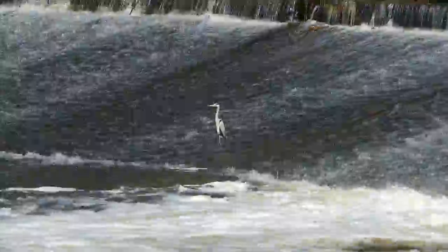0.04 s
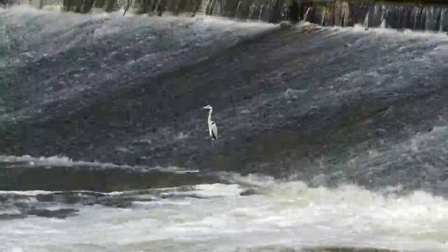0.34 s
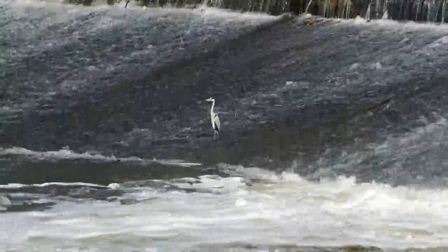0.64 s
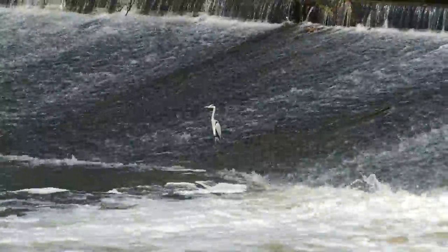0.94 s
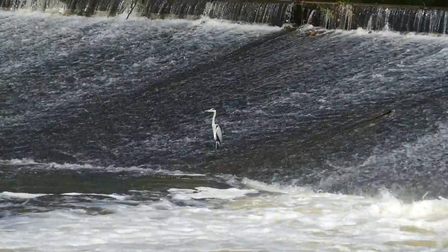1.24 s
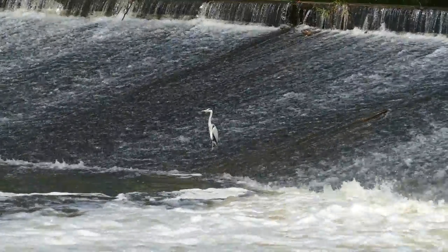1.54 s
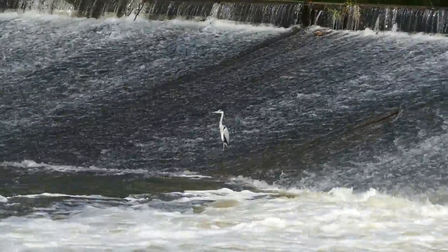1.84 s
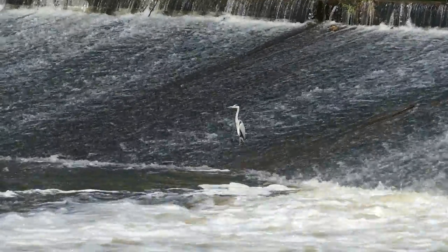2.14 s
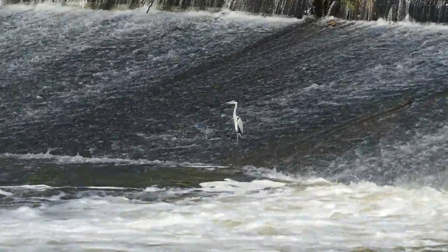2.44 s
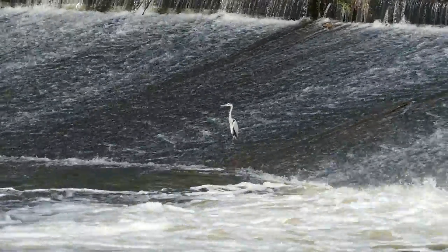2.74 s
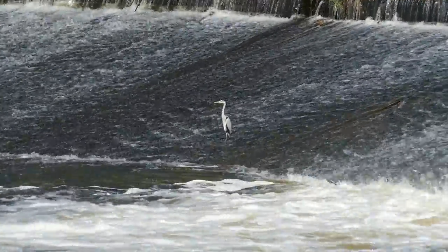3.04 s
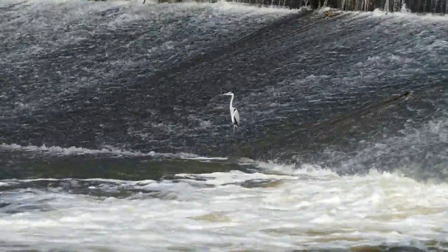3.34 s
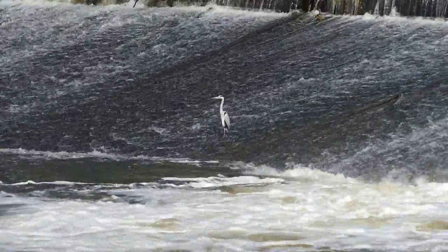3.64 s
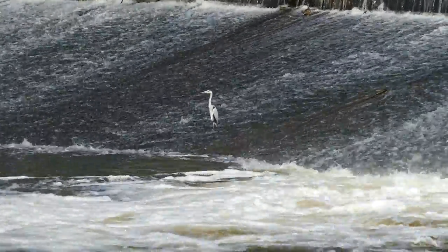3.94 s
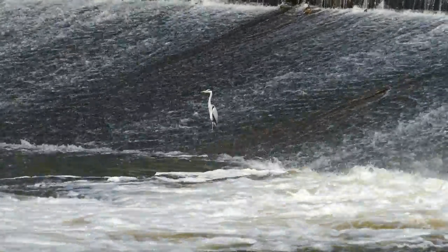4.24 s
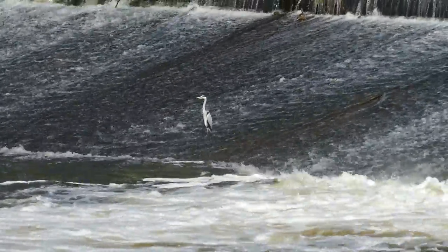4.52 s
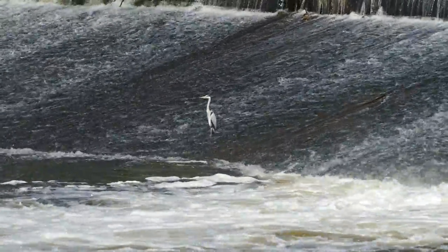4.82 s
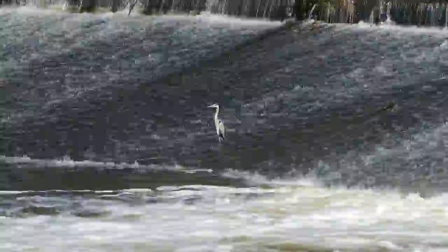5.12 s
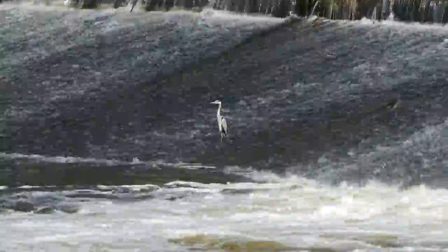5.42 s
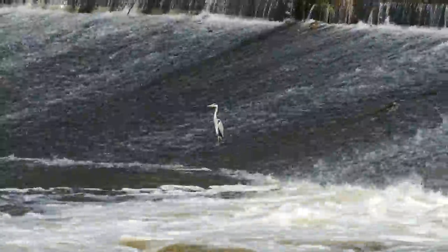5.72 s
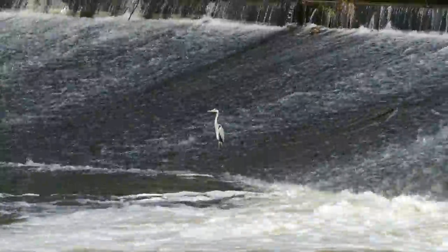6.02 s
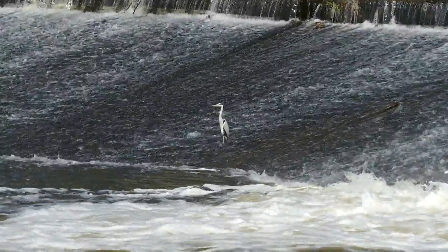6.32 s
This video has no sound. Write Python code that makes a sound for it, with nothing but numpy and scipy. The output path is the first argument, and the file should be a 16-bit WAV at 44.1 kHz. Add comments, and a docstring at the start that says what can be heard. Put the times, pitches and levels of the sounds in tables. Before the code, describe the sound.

The continuous rush and hiss of water sliding down a weir and churning into foam, with light gusts on the microphone.

```python
"""On a river bank, beside a broad weir where the water slides down and plunges into a pool of foam.
Clouds of resonating bubbles make the plunge roar; above it the thin sheet of water hisses, grained
by falling drops and bursting bubbles. Light gusts shed eddies at the two microphone ports and
rumble softly. The sound starts abruptly, with one small tick soon after."""
import sys
import numpy as np
from scipy import signal
from scipy.fft import rfft, irfft, next_fast_len
from scipy.io import wavfile
from scipy.ndimage import uniform_filter1d

SR = 44100
rng = np.random.default_rng(int(sys.argv[2]) if len(sys.argv) > 2 else 0)


def waveform_to_disk(signal):
    """Save audio, clipped to [-1, 1], as 16-bit WAV at the path in sys.argv[1]."""
    frames = np.transpose(np.atleast_2d(signal))
    scaled = np.clip(frames, -1, 1) * 32767
    samples = np.round(scaled).astype(np.int16)
    wavfile.write(sys.argv[1], SR, samples)


N = 280917
TIME = np.arange(N) / SR
START_S = 0.2283
CROSSOVER_HZ = 1270   # the roar lies below, the hiss above


def from_db(db):
    """Amplitude ratio of a level in decibels."""
    return 10 ** (np.asarray(db) / 20)


def unit_rms(x):
    """Normalisation to unit mean power."""
    return x / np.sqrt(np.mean(x ** 2) + 1e-20)


def in_time(points):
    """Linear interpolation of (time [s], value) rows at every sample."""
    return np.interp(TIME, *np.transpose(points))


def at_hz(points, hz):
    """Interpolation of (frequency [Hz], value) rows on a logarithmic axis."""
    centres, values = np.transpose(points)
    return np.interp(np.log(hz), np.log(centres), values)


def to_bins(x):
    """Fourier transform: frequencies and complex spectrum."""
    size = next_fast_len(N, True)
    return np.maximum(np.fft.rfftfreq(size, 1 / SR), 1), rfft(x, size)


def to_samples(bins):
    """Inverse Fourier transform."""
    return irfft(bins, next_fast_len(N, True))[..., :N]


def lowpass_gain(hz, edge_hz, order):
    """Magnitude response of a Butterworth low-pass."""
    return 1 / np.sqrt(1 + (hz / edge_hz) ** (2 * order))


def butterworth(x, edge_hz, kind, order=8):
    """Maximally flat low-pass or high-pass filtering."""
    return signal.sosfilt(signal.butter(order, edge_hz, kind, fs=SR, output="sos"), x)


def drift(rate_hz):
    """Slow random fluctuation: noise low-passed at rate_hz, with unit rms."""
    step, warm_up = 40, 2000
    pole = np.exp(-2 * np.pi * rate_hz * step / SR)
    noise = rng.standard_normal(N // step + warm_up + 2)
    slow = signal.lfilter([1], [1, -2 * pole, pole * pole], noise)[warm_up:]
    return np.interp(np.arange(N) / step, np.arange(len(slow)), unit_rms(slow))


def evened(x, window):
    """Division by the running rms takes the chance swells out of a noise."""
    power = uniform_filter1d(uniform_filter1d(np.mean(x ** 2, axis=0), window), window)
    return x * np.sqrt(np.mean(power) / (power + 1e-20))


def resonator(force, hz, radius):
    """A damped oscillator, whose amplitude shrinks by the factor `radius` each sample."""
    angle = 2 * np.pi * hz / SR
    return signal.lfilter([1, 0, -1], [1, -2 * radius * np.cos(angle), radius ** 2], force + 1e-18)


def impacts(per_s, spread_db):
    """Shot noise: randomly timed impulses, many small and a few large."""
    sizes = from_db(spread_db * np.minimum(rng.exponential(1, N), 4))
    return unit_rms(sizes * rng.choice([-1, 1], N) * (rng.random(N) < per_s / SR))


def bubbles(low_hz, high_hz, per_s, cycles, spread_db, sizes):
    """Bubble resonance: each size rings at its own frequency, falling 60 dB in `cycles` periods."""
    cloud = np.zeros(N)
    for hz in np.geomspace(low_hz, high_hz, sizes):
        radius = from_db(-60 * hz / (cycles * SR))
        ringing = resonator(impacts(per_s / sizes, spread_db), hz, radius)
        cloud += np.sqrt(hz) * unit_rms(ringing)   # about equal power per Hz
    return unit_rms(cloud)


# Gusts at the ports: (crest time [s], crest level [dB], decay time [s])
GUST_CRESTS = [(0.52, -48, 0.2), (1.24, -31, 0.67), (1.95, -33, 0.35), (2.32, -34.5, 0.64),
               (2.95, -30, 0.98), (3.6, -33, 0.27), (4.92, -34, 0.11), (5.95, -41, 0.13)]

def gust_envelope(rise_s=0.12, lull_db=-43.5):
    """Incoherent addition: the power of each rising and dying gust adds to that of the light air."""
    power = from_db(lull_db) ** 2
    for crest_s, db, decay_s in GUST_CRESTS:
        age = TIME - crest_s
        shape = np.exp(-(np.minimum(age, 0) / rise_s) ** 2 - np.maximum(age, 0) / decay_s)
        power = power + (from_db(db) * shape) ** 2
    return np.sqrt(power)


# Eddy pressure at the ports: (frequency [Hz], relative spectral level [dB])
EDDY_SPECTRUM = [(22, -38), (42, -19), (97, -5.5), (157, 0), (259, -2.5), (419, -10)]

def breeze(lump_db=3.5, top_hz=400, shared_db=-1.5):
    """Turbulent pressure: each port has its own eddies, larger ones reach both; all swell in gusts."""
    hz, white = to_bins(rng.standard_normal((2, N)) + from_db(shared_db) * rng.standard_normal(N))
    eddies = to_samples(white * from_db(at_hz(EDDY_SPECTRUM, hz)) * lowpass_gain(hz, top_hz, order=4))
    lumps = from_db(lump_db * np.array([drift(11), drift(9.5)]))
    return unit_rms(eddies * lumps) * gust_envelope()


# Impulses that excite the tick: (time [s], excitation level [dB])
TICK_SNAPS = [(0.3060, -14.5), (0.3076, -20), (0.3079, -23)]
# Resonances of the tick: (frequency [Hz], bandwidth [Hz], gain [dB])
TICK_MODES = [(3800, 1400, -16), (5500, 850, 1.5), (6960, 500, -12), (10000, 1100, -7), (12100, 700, -21)]

def tick(top_hz=11500):
    """Impulse response: three quick snaps near the microphone excite heavily damped resonances."""
    snaps = np.zeros(N)
    for time_s, db in TICK_SNAPS:
        snaps[int(time_s * SR)] = from_db(db)
    crack = np.zeros(N)
    for hz, width_hz, db in TICK_MODES:
        crack += from_db(db) * resonator(snaps, hz, radius=np.exp(-np.pi * width_hz / SR)) / 2
    return butterworth(crack, top_hz, "low", order=6)


# Peaks and dips of the microphone housing: (frequency [Hz], bandwidth [Hz], gain [dB])
HOUSING_MODES = [(423, 50, 1.0), (997, 70, 2), (2990, 130, -2.5), (3300, 410, 1.7), (4400, 300, 1.3),
                 (4720, 130, -2.5), (6200, 280, -1.5)]

def housing_gain(hz):
    """Resonance in the housing raises or lowers a narrow band around each mode."""
    return from_db(sum(db / (1 + (2 * (hz - centre) / width) ** 2) for centre, width, db in HOUSING_MODES))


# Likeness of the water's sound at the two ports: (frequency [Hz], coherence [0-1])
PORT_COHERENCE = [(101, 1), (283, 1.0), (959, 0.68), (1300, 0.72), (1420, 0), (1550, 0.72), (2250, 0.76),
                  (2400, 0.51), (3630, 0.89), (7300, 0.8), (9080, 0.38), (13700, 0.14)]
# Level difference between the ports: (frequency [Hz], left minus right [dB])
PORT_LEVEL_GAP = [(101, -1.5), (477, 0.0), (509, -2.5), (607, -7.5), (823, -5.5), (980, -0.5), (1140, -3.5),
                  (1220, -5.5), (1420, 15), (1690, 4.5), (1890, 0.5), (2400, -3.5), (3190, -0.2),
                  (13700, -2.5)]
# Phase difference between the ports: (frequency [Hz], lead of the left [rad])
PORT_LEAD = [(302, -0.02), (428, -0.13), (521, -0.56), (788, 0.19), (918, -0.01), (1390, -3.47),
             (1450, -5.69), (1810, -6.42), (2350, -6.35), (2680, -5.88), (6990, -6.41)]

def at_ports(source, spectrum):
    """Partial coherence: a source and diffuse sound from the banks mix, coloured by `spectrum`."""
    hz, (direct, diffuse) = to_bins(np.array([source, rng.standard_normal(N)]))
    side = np.array([[1], [-1]])   # left, right
    coherence = np.clip(at_hz(PORT_COHERENCE, hz), 0, .995)
    pair = np.sqrt(1 + coherence) * direct + np.sqrt(1 - coherence) * diffuse * side
    balance = from_db(side * at_hz(PORT_LEVEL_GAP, hz) / 2)
    balance /= np.sqrt(np.mean(balance ** 2, axis=0))   # total power is conserved
    phase = np.exp(.5j * side * at_hz(PORT_LEAD, hz))
    colour = housing_gain(hz) * from_db(at_hz(spectrum, hz))
    return unit_rms(to_samples(pair * balance * phase * colour))


# The thin sheet on the slope and its spray: (frequency [Hz], relative spectral level [dB])
HISS_SPECTRUM = [(1270, -11), (1520, -10.5), (1850, -16), (2060, -15.5), (2730, -20), (4320, -18.5),
                 (4720, -21), (5380, -21), (6990, -25.5), (8140, -32), (10100, -33.3), (12300, -45),
                 (14400, -54), (15000, -60.5)]

def spray(level_db=-30.5, drop_db=-10.0, fizz_db=-11.0, flutter_db=0.38, excess_db=1, settle_s=0.64):
    """Broadband flow noise: the sheet hisses; drop impacts and small bursting bubbles add a grain."""
    drops = impacts(per_s=5000, spread_db=2.5)
    fizz = bubbles(low_hz=1270, high_hz=9660, per_s=2500, cycles=24, spread_db=1.5, sizes=28)
    sheet = unit_rms(rng.standard_normal(N) + from_db(drop_db) * drops + from_db(fizz_db) * fizz)
    hiss = unit_rms(butterworth(at_ports(sheet, HISS_SPECTRUM), CROSSOVER_HZ, "high"))
    settling_db = excess_db * np.exp(-(TIME - START_S) / settle_s)   # a little stronger at first
    return hiss * from_db(level_db + settling_db + flutter_db * drift(rate_hz=13.0))


# Bubble clouds in the plunge pool: (frequency [Hz], relative spectral level [dB])
ROAR_SPECTRUM = [(22, -36.8), (28, -36.5), (40, -31), (73, -17), (125, -5.5), (175, -3.5), (315, 0.4),
                 (419, -3.5), (530, -8), (610, -5.5), (740, -4), (850, -4.5), (980, -5.5), (1120, -9.5),
                 (1270, -9.5)]
# Surges of the deep roar: (time [s], relative level [dB])
DEEP_SURGES = [(0.26, -1.5), (0.38, 1.2), (0.51, -0.5), (0.77, 1), (1.14, -0.6), (1.39, 1), (1.53, -2.5),
               (1.83, 1.3), (2.35, -2.3), (2.58, 1.5), (2.71, -1.1), (2.99, 1.0), (3.34, -1.2), (4.08, 0.7),
               (4.6, -0.6), (5.23, 0.4), (5.38, -0.4), (5.73, 2), (5.9, -1.5), (6.1, 0.5), (6.34, -1)]
# Swells of the foam's hollow upper churn: (time [s], relative level [dB])
FOAM_SWELLS = [(0.26, 0.6), (1.92, -0.4), (2.26, 0.7), (2.88, -0.9), (3.8, 0.4), (4.19, -1.7), (4.49, 0.5),
               (5.16, -1), (5.7, 0.6), (6.15, 0), (6.34, 0.8)]

def plunge(level_db=-24.5, near_db=-11.5, churn_db=-0.07, deep_top_hz=470, foam_bottom_hz=710):
    """Superposition: countless far bubbles merge into a roar, and nearer ones gulp through it."""
    near = bubbles(low_hz=179.0, high_hz=1177, per_s=3000, cycles=19.5, spread_db=0.9, sizes=30)
    pool = unit_rms(rng.standard_normal(N) + from_db(near_db) * near)
    roar = unit_rms(butterworth(at_ports(pool, ROAR_SPECTRUM), CROSSOVER_HZ, "low"))
    # the deep water and the foam swell separately
    hz, bins = to_bins(roar)
    deep = to_samples(bins * lowpass_gain(hz, deep_top_hz, order=6))
    foam = roar - to_samples(bins * lowpass_gain(hz, foam_bottom_hz, order=6))
    middle = roar - deep - foam
    surging = evened(deep, window=SR // 6) * from_db(in_time(DEEP_SURGES))
    swelling = evened(foam, window=SR // 4) * from_db(in_time(FOAM_SWELLS))
    return (surging + middle + swelling) * from_db(level_db + churn_db * drift(rate_hz=19.0))


def scene():
    """Sound pressures add: water across the river, wind and a tick at the microphone."""
    return plunge() + spray() + breeze() + tick()


def record(dry, cutoff_hz=15100):
    """Gating and band limiting: the sound opens abruptly and a steep low-pass cuts the top."""
    opened = dry * (TIME >= START_S)
    return signal.sosfilt(signal.ellip(10, .1, 80, cutoff_hz, fs=SR, output="sos"), opened)


dry = scene()
out = record(dry)
waveform_to_disk(out)
```